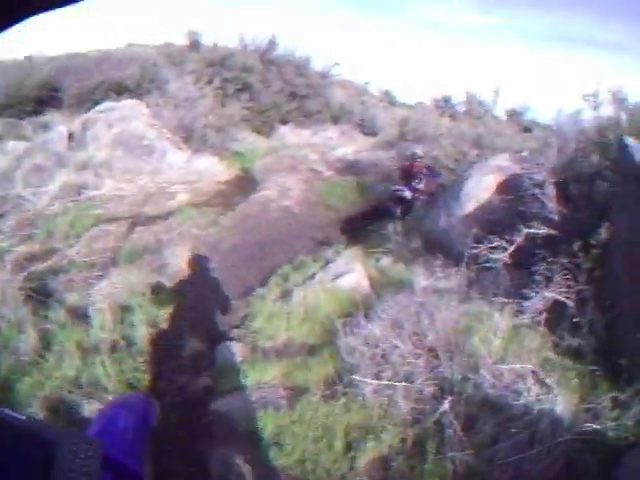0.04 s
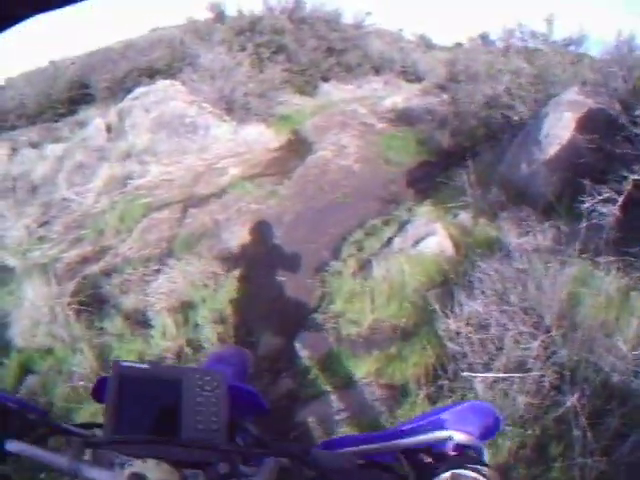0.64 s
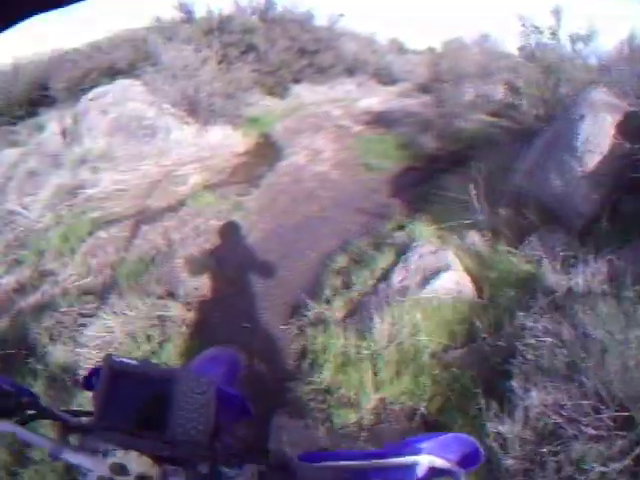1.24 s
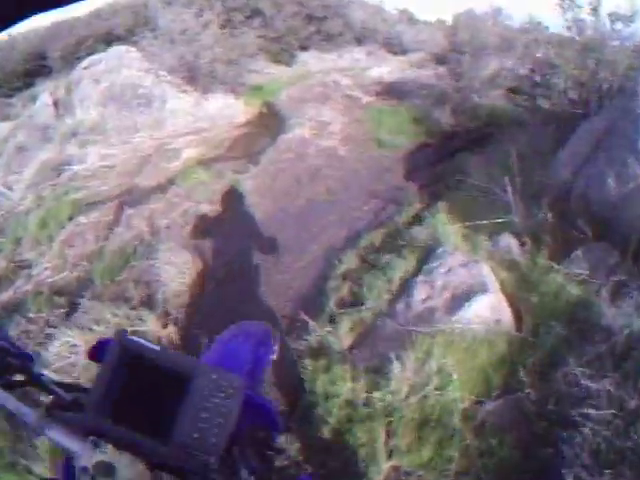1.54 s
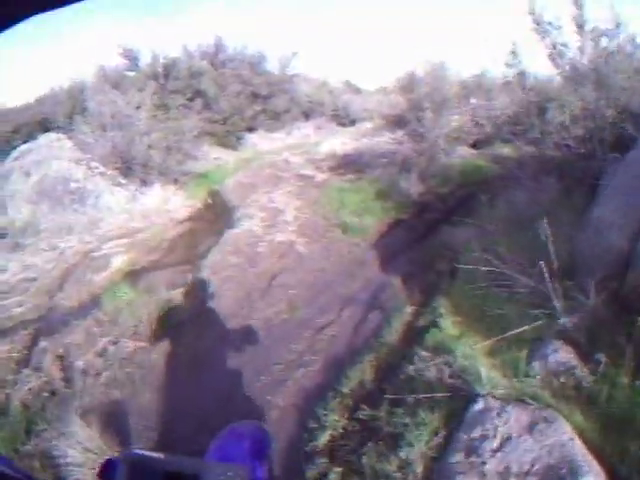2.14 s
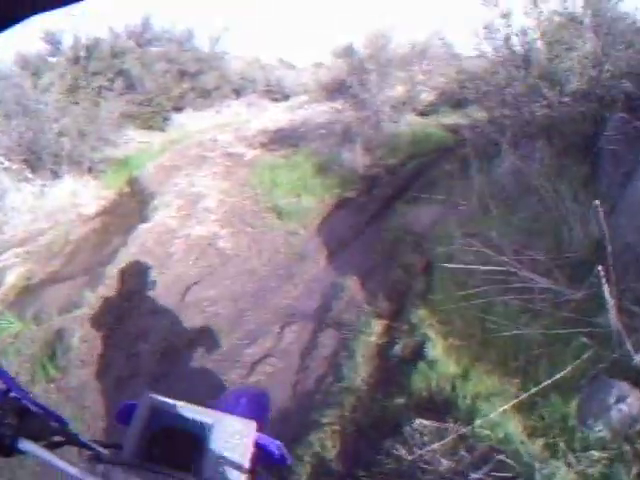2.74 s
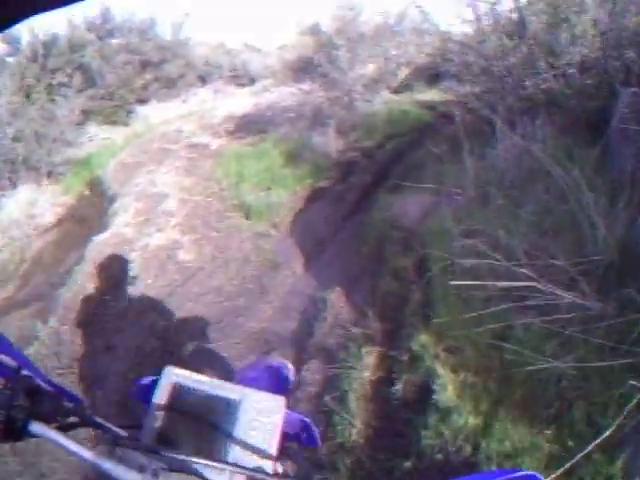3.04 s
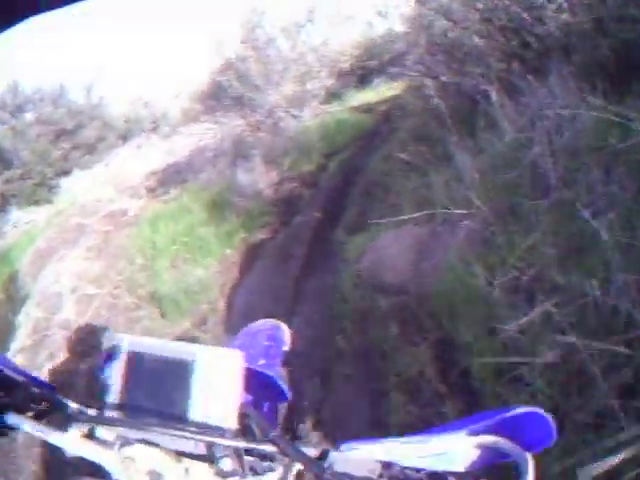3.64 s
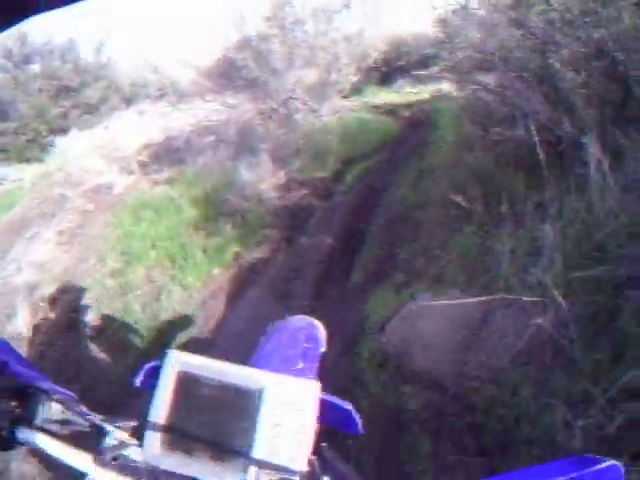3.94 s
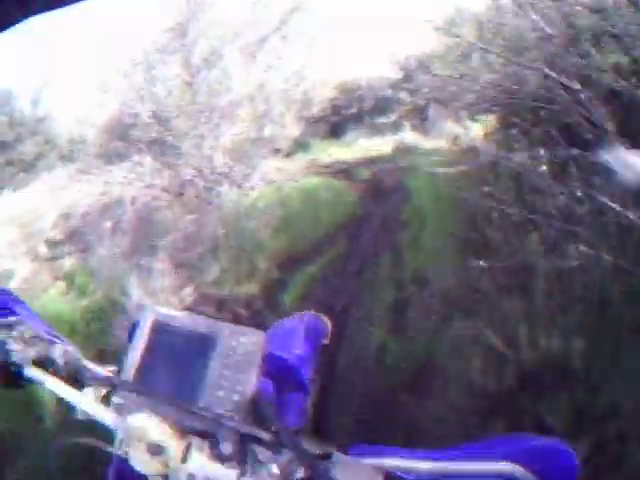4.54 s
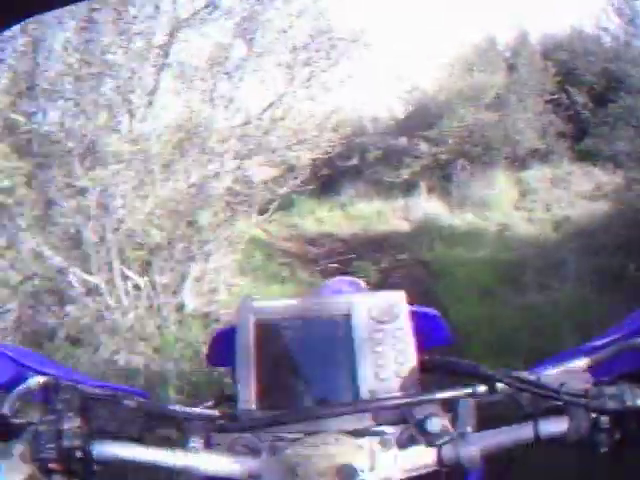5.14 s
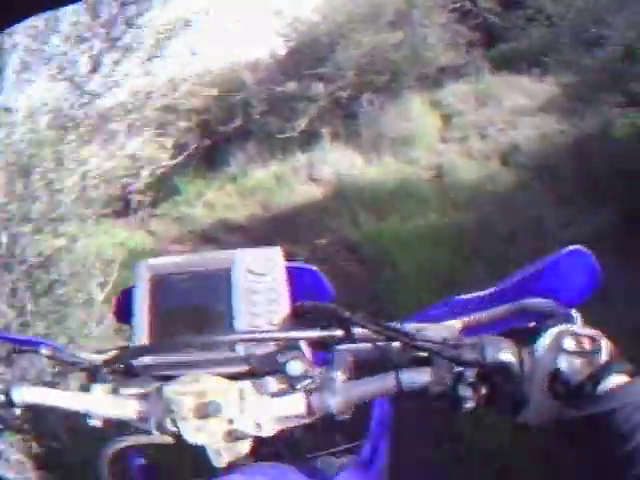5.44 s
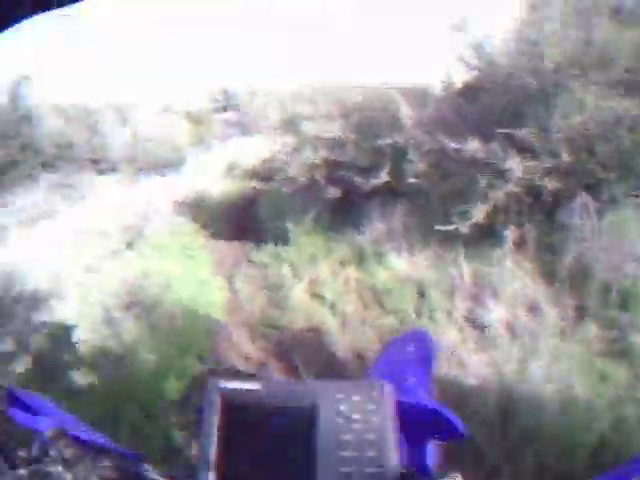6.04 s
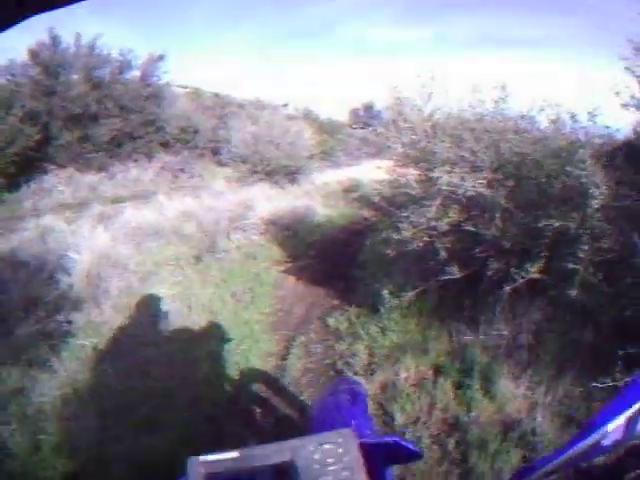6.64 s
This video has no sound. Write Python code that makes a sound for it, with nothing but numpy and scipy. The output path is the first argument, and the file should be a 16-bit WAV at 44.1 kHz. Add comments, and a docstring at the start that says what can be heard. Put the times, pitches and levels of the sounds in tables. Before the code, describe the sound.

A four-stroke dirt bike thumps near idle, revs hard up a rise, drops back and picks up again, close and distorted.

```python
"""A single-cylinder four-stroke dirt bike, heard from the rider's helmet, thumps near idle, pulls up a
rise with the throttle open, drops back and picks up again. Each firing excites resonators: the exhaust
pipe honks, the silencer booms, and knocks ring the engine case and fins. Wind and frame rumble beneath.
The sound overdrives a small camera's input, which passes little above 4 kHz."""
import sys
import numpy as np
from scipy.fft import rfft, irfft, next_fast_len
from scipy.io import wavfile
from scipy.ndimage import uniform_filter1d

SR = 44100
rng = np.random.default_rng(int(sys.argv[2]) if len(sys.argv) > 2 else 0)


def output_pcm(signal):
    """Save a mono or channel-first signal as 16-bit PCM at the path in sys.argv[1].

    Samples are clipped to [-1, 1] before scaling.
    """
    pcm = np.clip(np.atleast_2d(signal).T, -1, 1) * 32767
    wavfile.write(sys.argv[1], SR, np.round(pcm).astype(np.int16))


N = 298998

# Engine speed. Each row: time in seconds, firings per second.
FIRING_RATE = [(0.0, 14.67), (0.91, 15.47), (1.3, 14.05), (1.59, 16.31), (2.21, 14.51), (2.54, 15.27),
               (3.04, 20.16), (3.15, 26.31), (3.34, 32.37), (3.9, 35.21), (4.17, 40.62), (4.8, 39.11),
               (5.0, 41.46), (5.2, 38.92), (5.27, 17.59), (5.55, 13.99), (5.86, 19.68), (6.15, 15.11),
               (6.64, 29.43), (6.78, 39.82)]
# Engine load. Each row: time in seconds, throttle opening from 0 to 1.
THROTTLE_OPENING = [(0, 0.09), (2.65, 0), (2.95, 0.3), (3.22, 0.5), (3.42, 0.9), (4.1, .92), (5.15, 0.92),
                    (5.26, 0.5), (5.5, .1), (5.85, 0.4), (6.13, 0.04), (6.4, 0.6), (6.62, 0.8), (6.78, 0.8)]
# Misfires, which leave the pipe without its honk. Each entry: time in seconds.
MISFIRE_TIMES = [.82, .95, 1.085]
# Boom of the silencer. Each row: time in seconds, relative level in dB.
SILENCER_LEVEL = [(0, -11), (.45, -12), (.72, -22), (2.35, -20.5), (2.52, -10), (3.0, -5.5), (3.45, -14),
                  (3.7, -11), (4.12, -24), (4.44, -10.5), (4.72, -24), (5.12, -14.5), (5.4, -21.5),
                  (6.78, -15)]
# Impacts of combustion, valves and piston. Each row: share of the cycle, relative level in dB.
CYCLE_KNOCKS = [(.01, 0), (.08, -5), (.31, -7), (.63, -4), (.94, -6)]
# Modes of the engine case. Each row: frequency in Hz, bandwidth in Hz, relative level in dB.
CASE_MODES = [(438.4, 256, -4), (514.5, 46.9, 4), (561.2, 56, 0.5), (656, 84.6, -3)]
# Modes of the cylinder and fins. Each row: frequency in Hz, bandwidth in Hz, relative level in dB.
FIN_MODES = [(747, 47.4, 7), (883, 138, 0.5), (1020, 285, -2.5), (1430, 990, -11.5)]
# Spells in which the case rings harder. Each row: middle in seconds, half length in seconds, gain in dB.
CASE_SPELLS = [(0.831, 0.19, 4), (3.822, 0.081, 3.5), (4.556, 0.1, 3.5), (5.148, 0.043, 1.5)]
# Clatter of piston and chain. Each row: frequency in Hz, relative spectral density in dB.
CLATTER_SPECTRUM = [(300, -33), (700, 7), (1100, 6.5), (1500, -7), (2000, -7.5), (3000, -18.5),
                    (3800, -33.5), (4600, -60)]
# Rumble of wind and frame. Each row: frequency in Hz, relative spectral density in dB.
RUMBLE_SPECTRUM = [(10, -15.5), (30, -1.5), (50, -16), (75, -1), (115, 1), (170, -2.5), (260, -7),
                   (600, -68)]
# Treble response of the camera's output. Each row: frequency in Hz, gain in dB.
TREBLE_RESPONSE = [(3600, 0), (4400, -3.5), (5500, -6), (8000, 1), (10000, -4), (15500, -9.5)]


def exhaust(cycle, rate, throttle):
    """Pulse excitation: each opening of the exhaust valve thumps, and rings the pipe and the silencer."""
    starts = strokes(cycle, at=.12)
    heat = throttle[starts, None] ** 2.5  # hotter gas carries sound faster, raising both resonances
    t = np.arange(SR // 6) / SR
    honk = pipe_honk(t, starts, rate, heat)
    boom = silencer_boom(t, heat)
    pulse_age = t / 0.0028  # in time constants
    push = -pulse_age * (2 - pulse_age) * np.exp(-pulse_age)
    pipe = amp(pipe_level(rate, throttle)) * train(starts, honk, rate, scatter_db=1.96, jitter_s=.00003)
    silencer = amp(curves(SILENCER_LEVEL)[0]) * train(starts, boom, rate, scatter_db=2, jitter_s=.00023)
    thump = amp(-12.5 - 5 * throttle) * train(starts, push, rate, scatter_db=4.5, jitter_s=.00008)
    return pipe + silencer + thump


def pipe_honk(t, starts, rate, heat):
    """Resonance of a gas column: at each firing the pipe's note rises and falls with the valve's lift."""
    cool_hz, hot_hz = 290, 376
    uneven_hz = 6 * (1.1 - heat) * rng.standard_normal(heat.shape)  # idle cycles burn unevenly
    peak_hz = cool_hz + (hot_hz - cool_hz) * heat + uneven_hz
    open_s = .036 * (rate[starts, None] / 15) ** -.42  # the valve closes sooner at speed
    lift = np.abs(np.sin(np.pi * np.minimum(t / open_s, 1)))
    note_hz = peak_hz * (1 - (.65 - 0.35 * heat) * (1 - lift) ** 2)
    phase = 2 * np.pi * np.cumsum(note_hz, axis=1) / SR
    flow = .35 * heat  # under load the gas flow pushes the wave off centre
    burns = np.abs(starts[:, None] / SR - MISFIRE_TIMES).min(axis=1, keepdims=True) > .03
    return -(np.sin(phase) + flow) * np.sqrt(lift) * burns


def pipe_level(rate, throttle):
    """Exhaust tuning: the honk's level in dB leaps as the pipe comes into tune and sinks as revs fall."""
    tuned_rate, step_width = 35.7, 0.61  # firings per second
    in_tune = (1 + np.tanh((rate - tuned_rate) / step_width)) / 2
    overrun = np.tanh(np.maximum(-speed_change(rate), 0) / 1.4)
    return -14 - 2 * throttle + 9.5 * in_tune - 7 * overrun


def silencer_boom(t, heat):
    """Damped oscillation: the silencer rings at one low note, dying away exponentially."""
    cool_hz, hot_hz, decay_s = 145, 166, 0.15
    boom_hz = cool_hz + (hot_hz - cool_hz) * heat
    return -np.sin(2 * np.pi * boom_hz * t) * amp(-60 * t / decay_s)


def engine_case(cycle, rate, throttle):
    """Modal vibration: knocks at fixed points of the cycle ring case and fins; loose parts churn."""
    taps = sum(amp(db) * train(strokes(cycle, share), np.ones(1), rate, scatter_db=.33, jitter_s=.00003)
               for share, db in CYCLE_KNOCKS)
    # under load the slack is taken up: the regular knocks grow and the churning fades
    knocks = amp(-6.5 + 2.4 * throttle) * resonate(taps, CASE_MODES)
    churn = amp(-1 - 4.2 * throttle) * resonate(rng.standard_normal(N), CASE_MODES)
    ring = amp(case_level(rate, throttle)) * (knocks + churn)
    low_hz, high_hz = 360, 720  # the case radiates only around its own modes
    ring = filtered(ring, lambda hz: ((1 + (low_hz / (hz + 1)) ** 10) * (1 + (hz / high_hz) ** 10)) ** -.5)
    fins = amp(-32.5 + 12.35 * throttle) * resonate(taps, FIN_MODES)
    return ring + fins


def case_level(rate, throttle):
    """Backlash: speed changes slap the gears, raising the case's level in dB, as do load and spells."""
    lash = np.tanh(np.abs(speed_change(rate)) / 0.59)
    t = np.arange(N) / SR
    spells_db = sum(db * np.exp(-((t - middle) / half) ** 2) for middle, half, db in CASE_SPELLS)
    return -13.5 + 1.38 * throttle + 2 * lash + spells_db


def clatter(cycle, throttle):
    """Amplitude-modulated noise: the rattle of piston and chain swells and decays after each firing."""
    share = cycle % 1
    envelope = unit((1 - np.exp(-share / .012)) * np.exp(-share / .36) + .06)
    return amp(-25.5 - throttle) * envelope * noise(CLATTER_SPECTRUM)


def heave(cycle, throttle):
    """Forced vibration: under load the power strokes heave the bike at the firing frequency."""
    peak_share = 0.091
    return amp(-16) * throttle * np.cos(2 * np.pi * (cycle - peak_share))


def rumble():
    """Random excitation: wind and frame give a steady low noise."""
    return amp(-15) * noise(RUMBLE_SPECTRUM)


def strokes(cycle, at):
    """Samples at which the engine passes a given share of its cycle."""
    return np.flatnonzero(np.diff(np.floor(cycle - at)) > 0)


def train(starts, shapes, rate, scatter_db, jitter_s):
    """Superposition of one shape per stroke, uneven in size and timing, at rms 1."""
    size, late = rng.standard_normal((len(starts), 2)).T
    onsets = np.maximum(starts + (late * jitter_s * SR).astype(int), 0)
    samples = onsets[:, None] + np.arange(shapes.shape[-1])
    weight = amp(scatter_db * size) / np.sqrt(rate[starts])  # faster firing adds no mean power
    return unit(np.bincount(samples.ravel(), (weight[:, None] * shapes).ravel(), N)[:N])


def speed_change(rate):
    """Smoothed acceleration of the engine, in octaves per second."""
    return uniform_filter1d(np.gradient(np.log2(rate)) * SR, size=SR // 7)


def resonate(x, modes):
    """Modal summation: x drives damped resonators of alternating sign; the result has rms 1."""
    def response(hz):
        return sum((-1) ** k * amp(db) * 1j * hz * width / (centre ** 2 - hz ** 2 + 1j * hz * width)
                   for k, (centre, width, db) in enumerate(modes))
    return unit(filtered(x, response))


def noise(spectrum):
    """Coloured noise of rms 1."""
    return unit(colour(rng.standard_normal(N), spectrum))


def colour(x, points):
    """Spectral shaping of x by (Hz, dB) points on a logarithmic frequency axis."""
    point_hz, db = np.transpose(points)
    return filtered(x, lambda hz: amp(np.interp(np.log(hz + 1), np.log(point_hz), db)))


def filtered(x, response):
    """Linear filtering: the spectrum of x times a complex frequency response."""
    size = next_fast_len(N + SR // 2)
    return irfft(rfft(x, size) * response(np.fft.rfftfreq(size, 1 / SR)), size)[:N]


def curves(rows):
    """Linear interpolation: one value per sample for each column after the time."""
    times, *columns = np.transpose(rows)
    return [np.interp(np.arange(N) / SR, times, column) for column in columns]


def amp(db):
    """Amplitude ratio of a level in dB."""
    return 10 ** (np.asarray(db) / 20)


def unit(x):
    """x normalised to rms 1."""
    return x / np.sqrt(np.mean(x ** 2) + 1e-20)


def scene():
    """Superposition: the engine's sources add, growing louder with the throttle, over the rumble."""
    rate, = curves(FIRING_RATE)
    throttle = np.clip(curves(THROTTLE_OPENING)[0], 0, 1.1)
    cycle = np.cumsum(rate) / SR - .171  # running count of engine cycles
    engine = exhaust(cycle, rate, throttle) + engine_case(cycle, rate, throttle)
    engine += clatter(cycle, throttle) + heave(cycle, throttle)
    return (amp(1.14 + 7.88 * throttle) * engine + rumble())[None]


def record(dry):
    """Nonlinear distortion: the preamp clips, and its coupling capacitor makes the flat tops droop."""
    ceiling, hardness = 0.64, 60
    coupling_hz, band_hz, top_hz = 45, 3850, 15850
    clipped = dry[0] / (1 + np.abs(dry[0] / ceiling) ** hardness) ** (1 / hardness)
    drooped = filtered(
        clipped, lambda hz: 1j * hz / (coupling_hz + 1j * hz) / np.sqrt(1 + (hz / band_hz) ** 36))
    crackling = np.clip(drooped, -.71, .71)  # the overshoots clip again
    return filtered(colour(crackling, TREBLE_RESPONSE), lambda hz: hz < top_hz)[None]


dry = scene()
out = record(dry)
output_pcm(out)
```